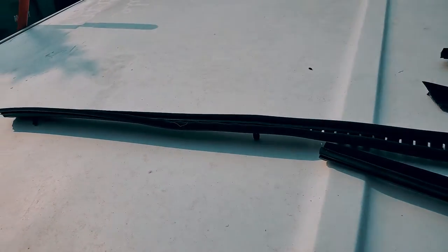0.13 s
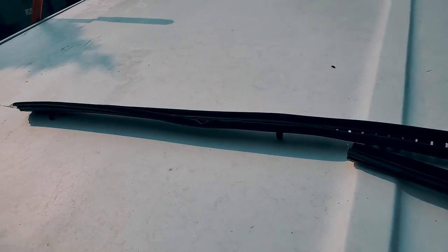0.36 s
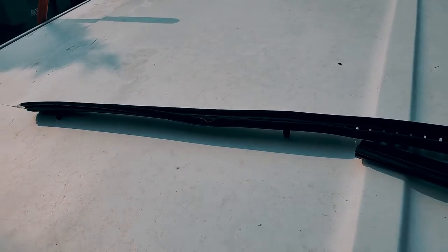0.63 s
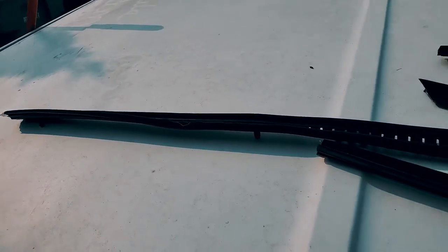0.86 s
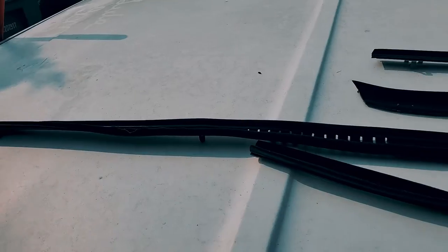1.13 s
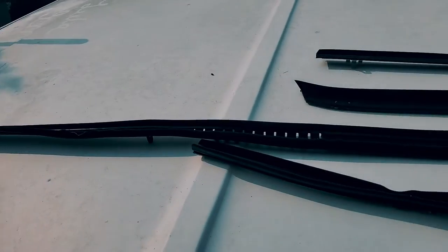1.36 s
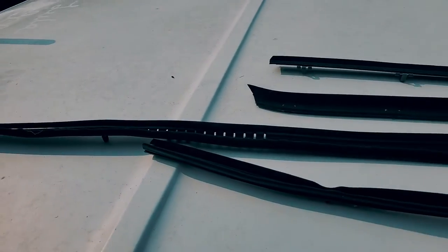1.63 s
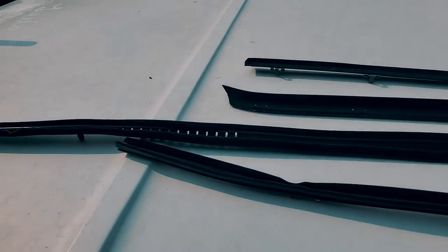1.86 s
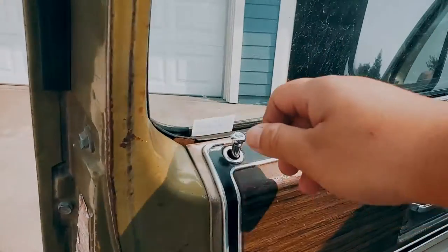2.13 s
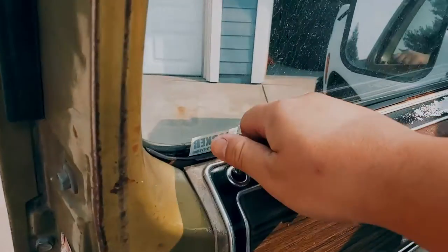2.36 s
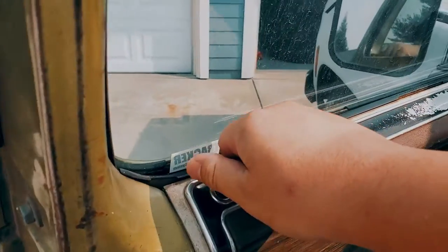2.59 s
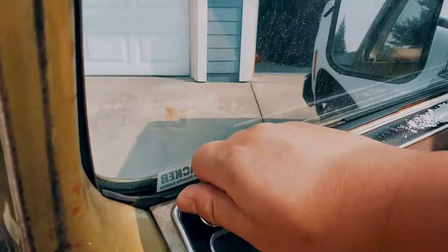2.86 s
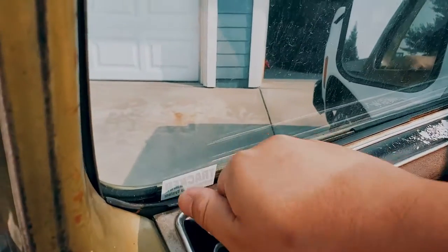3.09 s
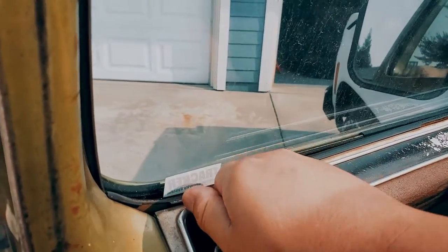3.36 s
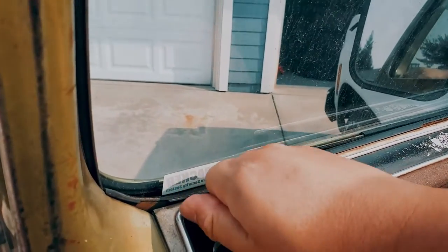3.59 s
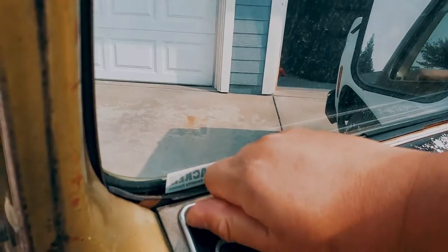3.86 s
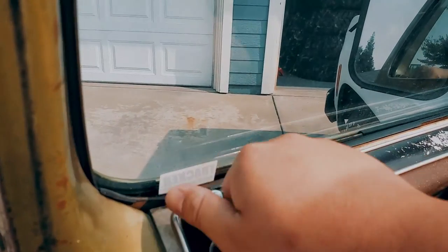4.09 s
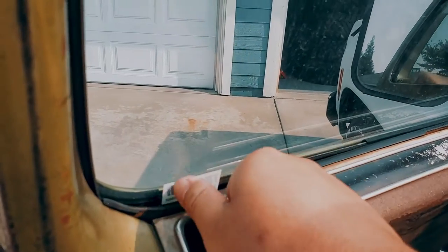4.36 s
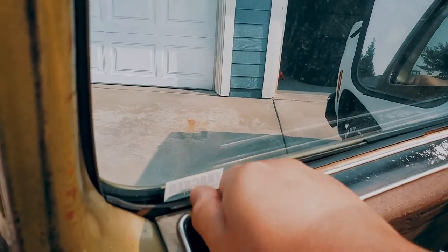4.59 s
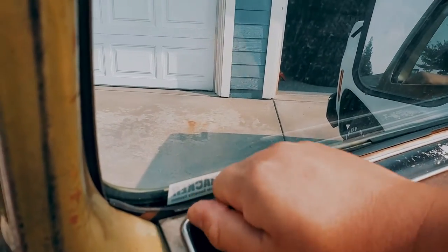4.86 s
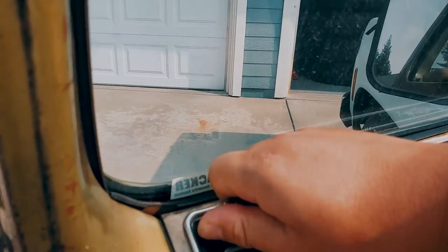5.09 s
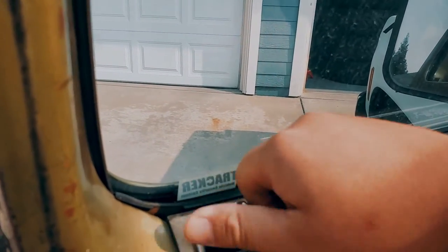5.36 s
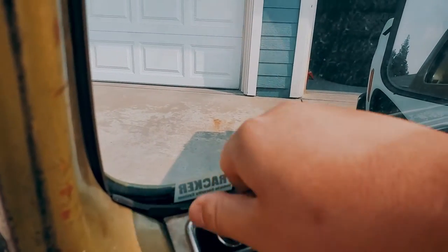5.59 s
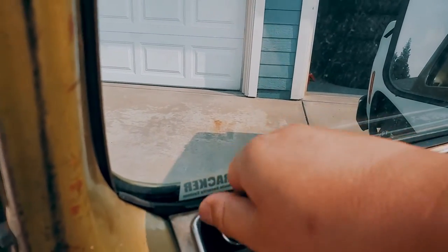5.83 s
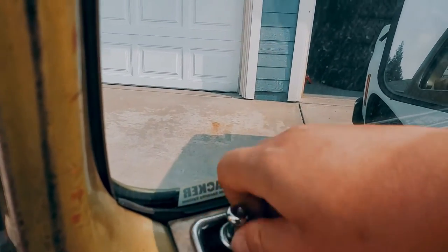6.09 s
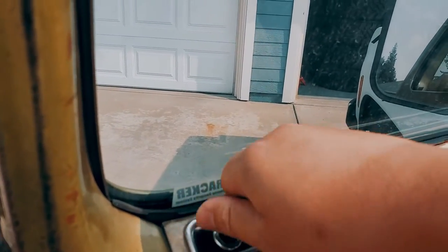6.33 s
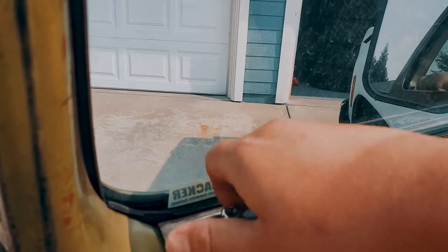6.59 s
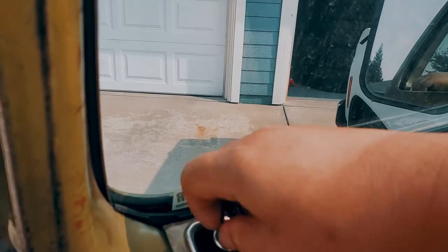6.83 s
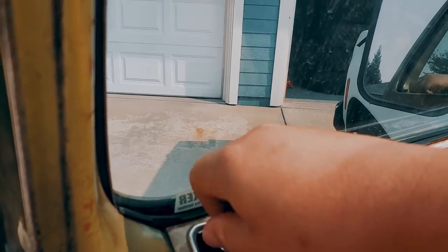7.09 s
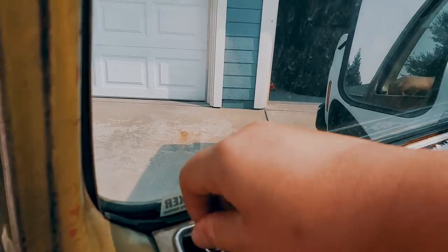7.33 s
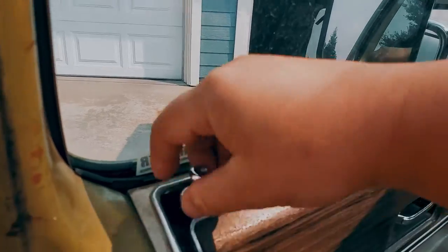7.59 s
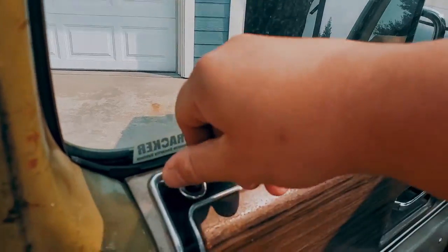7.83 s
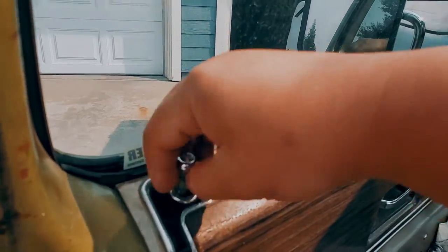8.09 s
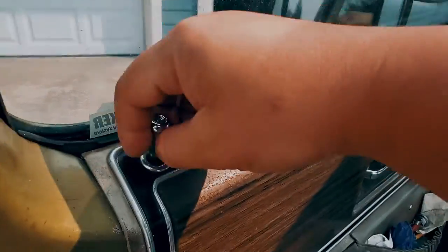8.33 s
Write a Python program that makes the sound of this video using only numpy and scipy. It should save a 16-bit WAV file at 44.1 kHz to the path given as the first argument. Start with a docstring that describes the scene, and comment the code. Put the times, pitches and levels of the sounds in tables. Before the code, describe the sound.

Quiet yard air with a distant engine passing first, then a low bump on the microphone and a tiny gap of nothing. The rest is very close stereo handling of a loose knob on a steel car door: sparse clicks with sharp clacks near the middle, panel rattling dully beneath, faint dry squeaks, and increasingly frequent gritty finger rubs towards the end.

```python
"""A far vehicle swells, then quickly fades away over the still air of a yard: noise, engine tones, a whine.
One low knock and a finger's slide on the microphone housing follow, then a brief total silence.
Then a hand works the lock knob of an open steel door: ticks are bursts of dense metal modes, rubs are
coloured noise with uneven grip, and the same forces ring the sheet and the hollow panel as modal filters.
Two close microphone ports hear it, alike in the bass and less so in the treble."""
import sys
import numpy as np
from scipy import signal
from scipy.fft import rfft, irfft, next_fast_len
from scipy.io import wavfile
from scipy.ndimage import uniform_filter1d

SR = 44100
rng = np.random.default_rng(int(sys.argv[2]) if len(sys.argv) > 2 else 0)


def elevation(decibels):
    """Turn decibel levels (scalar or array-like) into linear amplitude ratios."""
    levels = np.asarray(decibels, float)
    return 10 ** (levels / 20)


def bounce(signal):
    """Save signal as a 16-bit WAV file at the path given by the first command-line argument."""
    frames = np.transpose(np.atleast_2d(signal))
    limited = np.clip(frames, -1, 1)
    pcm = np.round(limited * 32767).astype(np.int16)
    wavfile.write(sys.argv[1], SR, pcm)


N = 372644  # length in samples

# steel door, hollow panel below 500 Hz and sheet above: (f/Hz, relative level/dB, free t60/s)
DOOR_MODES = [(93.7, -11, 0.84), (154, -4.5, 0.36), (178.9, -1, 0.2), (226.4, -6, 0.22),
              (274.2, -2.5, 0.089), (332, 4, 0.047), (363, -3, 0.18), (413, -11, 0.049), (676, 0.5, 0.025),
              (817, 1.5, 0.019), (968, 1.5, 0.01), (1188, 4, 0.015), (1500, 2.5, 0.0078),
              (1930, -5.5, 0.0063)]
HELD = 0.23  # share of the sheet's t60 left while a hand rubs it
RUB_SHAKE_DB, RUB_DEEP_DB = 4.5, 2  # rasp passed on to the upper and the lowest panel modes
# likeness of the door sound at the two ports: (f/Hz, likeness 0 to 1)
DOOR_LIKENESS = [(60, 1), (250, 0.99), (1000, 0.71), (4000, 0.25), (15000, 0.3)]
# phase by which the left port leads: (f/Hz, phase/rad)
LEFT_LEAD = [(0, -3.5), (2330, 1.5439), (5340, -2.5), (7240, -1.5), (12500, -2), (14500, -4.5)]
# level of left over right: (f/Hz, level/dB)
LEFT_LEAN = [(60, -0.5), (950, 0), (3770, 3.5), (15000, 6)]


def door():
    """Modal superposition: contact sounds radiate directly and their forces ring sheet and panel."""
    strikes, blows, snaps = knob_ticks()
    rubbing, rasp, pressure = rubs()
    slip_ticks, slip_blows = slips(pressure)
    direct = rubbing + slip_ticks + scrapes() + squeaks()
    blows += slip_blows
    shake, deep = thumps()

    grip = grit(1500, 6.8, 0.002)
    sheet_modes = [mode for mode in DOOR_MODES if mode[0] > 500]
    held_modes = [(hz, db, HELD * t60) for hz, db, t60 in sheet_modes]
    sheet = ring(3 * blows, sheet_modes) + snaps
    sheet += ring(grip * rasp * rng.standard_normal((2, N)), held_modes)
    sheet = highpass(sheet, 2, 350)

    upper_modes = [mode for mode in DOOR_MODES if 250 < mode[0] <= 500]
    lowest_modes = [mode for mode in DOOR_MODES if mode[0] <= 250]
    rattle = grit(900, 1.2, 0.0077) * rng.standard_normal((2, N))
    panel = ring((shake + elevation(RUB_SHAKE_DB) * rasp) * rattle + 0.27 * blows, upper_modes)
    panel += ring((deep + elevation(RUB_DEEP_DB) * rasp) * rattle + 0.1 * blows, lowest_modes)
    panel = highpass(panel, 2, 70)

    contact = direct * (0.38 + 0.37 * grip) + elevation(-2.5) * strikes
    return ports(contact + sheet + panel, DOOR_LIKENESS, LEFT_LEAD, LEFT_LEAN)


# strikes of knob and rod: (t/s, relative tick level/dB, force on the door over the tick/dB, colour f/Hz)
KNOB_TICKS = [(2.2321, -44, -17, 2360), (2.3493, -41.5, -8.5, 6800), (2.3702, -40, -1, 2220),
              (2.3837, -27, -17.5, 7300), (2.489, -29.5, -14, 6860), (2.577, -40.5, 2.5, 2500),
              (2.9634, -48.5, -19, 9000), (2.988, -39, -37, 5370), (3.074, -19.5, -24.5, 6960),
              (3.1442, -23.5, -17, 3960), (3.2292, -33.5, -5.5, 2140), (3.3382, -46, -22, 7000),
              (3.3576, -45.5, -22, 14000), (3.418, -49.5, -0.5, 5000), (3.5851, -37.5, -18.5, 7640),
              (3.637, -27.5, -27, 13000), (3.718, -41.5, -20, 4040), (3.955, -51, 5, 2260),
              (3.987, -29, -15.5, 2220), (4.019, -30.5, -21, 12300), (4.0328, -25, -18.5, 13200),
              (4.1, -36.5, -12, 2270), (4.128, -37, -11, 4040), (4.17, -17, -35.5, 7200),
              (4.557, -54.5, 1, 2200), (4.953, -14, -16, 5600), (5.268, -37, -24.5, 13200),
              (5.306, -10.5, -14.5, 6750), (5.335, -51, -1, 2500), (5.383, -24, -16, 2010),
              (5.514, -41.5, 2.5, 2550), (5.5687, -42, -6, 2260), (5.8383, -25, -14, 6800),
              (5.9419, -37.5, -8.5, 6000), (6.146, -8.5, -18, 7300), (6.235, -37, -7, 7040),
              (6.4223, -45.5, -16.5, 5500), (6.486, -39.5, -11, 5300), (6.5484, -29.5, -14, 7000),
              (6.6446, -37, -7.5, 6500), (6.7167, -39.5, -10, 5100), (6.7577, -43.5, -11.5, 6530),
              (6.847, -43, 0.5, 2000), (6.903, -29.5, -14, 12700), (6.934, -46, 4.5, 2500),
              (7.003, -31, -11, 2100), (7.067, -35.5, -19, 5970), (7.109, -45, -11.5, 6000),
              (7.1915, -34.5, -20, 7600), (7.205, -33, -29, 11000), (7.257, -38, -29, 10000),
              (7.267, -45.5, 1, 2500), (7.4474, -47.5, -6, 7020), (7.4758, -43, -0.5, 4130),
              (7.529, -43, -7, 6500), (7.68, -52, -7, 6000), (7.755, -44, -7, 6000),
              (7.787, -43.5, -10, 7000), (7.8156, -38.5, -5, 3470), (7.865, -55, 5, 3000),
              (7.916, -35, -29, 14700), (7.9495, -46.5, -2.5, 6000), (7.9962, -41, -3.5, 2010),
              (8.099, -36.5, -29, 2020), (8.1981, -41, -4, 7070), (8.214, -34.5, -10.5, 2140),
              (8.2924, -36.5, -11.5, 2370), (8.314, -27.5, -34, 7100), (8.386, -48, -9, 6000)]
HARD_DB = -21.5  # only ticks above this level ring the latch


def knob_ticks():
    """Impact excitation: each strike clicks, sends a blow into the door and, if hard, rings the latch."""
    strikes, blows, snaps = np.zeros((3, 2, N))
    force = jolt()
    t = np.arange(len(force)) / SR
    for s, db, force_db, hz in KNOB_TICKS:
        add(strikes, s, tick(db, hz))
        blow = elevation(db + force_db) * force * rng.standard_normal((2, len(t)))
        add(blows, s, blow)
        if db > HARD_DB:
            add(snaps, s, latch(blow * elevation(-60 * t / 0.043)))
    return strikes, blows, snaps


def jolt():
    """Two-stage decay of a contact force: the blow, then the rod rattling out."""
    t = np.arange(8192) / SR
    return elevation(-60 * t / 0.0081) + 0.31 * elevation(-60 * t / 0.26)


# spectrum of a tick: (f/Hz, relative density/dB per Hz)
TICK_SPECTRUM = [(900, -12), (1600, -11), (3900, -9.5), (7000, -2.5), (7800, -9.5), (15200, -6),
                 (16500, -35.5)]


def tick(db, hz, t60=0.066, treble_t60=0.026, tail_db=-20, tail_t60=0.28):
    """Frequency-dependent damping of dense metal modes: treble dies first, a faint duller tail stays."""
    t = np.arange(8192) / SR

    def peaks(f):
        """Random modal density: every tick draws its own peaks."""
        return elevation(4.8 * evened(uniform_filter1d(rng.standard_normal(len(f)), size=14)))

    full = evened(coloured(tinted(TICK_SPECTRUM, hz, len(t)), peaks))
    dull = coloured(full, lambda f: 1 / (1 + (f / 4500) ** 4))
    treble_decay = elevation(-60 * t / treble_t60) + 0.68 * elevation(-60 * t / 0.0041)
    body = (full - dull) * treble_decay + dull * elevation(-60 * t / t60)
    tail = (dull + 0.18 * full) * elevation(tail_db - 60 * t / tail_t60)
    rise = 1 - np.exp(-t / 0.0007)
    return elevation(db) * rise * (body + tail)


# nominal latch modes: (f/Hz, relative level/dB)
LATCH_MODES = [(973, -9.5), (1165, 1.5), (1335, -5), (1803, -4), (1949, -11), (2433, -9), (2740, -13)]
LATCH_DB, LATCH_T60, LATCH_SPREAD_DB = 9, 0.078, 3.5  # gain, decay in s, spread of mode levels


def latch(blow):
    """Modal ringing: each hard blow excites the latch modes in its own proportions, slightly detuned."""
    t = np.arange(4096) / SR
    body = np.zeros(len(t))
    for hz, db in LATCH_MODES:
        level_luck, pitch_luck = rng.standard_normal(2)
        decay = elevation(db + LATCH_SPREAD_DB * level_luck - 60 * t / LATCH_T60)
        body += decay * np.sin(2 * np.pi * hz * (1 + 0.013 * pitch_luck) * t)
    return elevation(LATCH_DB) * signal.fftconvolve(blow, body[None] / np.linalg.norm(body), axes=1)


# rubs of fingers and knob thread: (start t/s, end t/s, relative hiss level/dB, colour f/Hz)
RUB_STROKES = [(2.085, 2.204, -63.5, 2100), (2.336, 2.42, -52, 2100), (2.49, 2.674, -49.5, 5530),
               (2.739, 2.9, -63.5, 6470), (2.979, 3.028, -55, 14000), (3.335, 3.386, -57.5, 12700),
               (3.633, 3.791, -54.5, 4940), (3.939, 4.062, -54.5, 2100), (4.125, 4.163, -54, 2100),
               (4.862, 4.964, -60, 6450), (5.018, 5.189, -62, 6920), (5.183, 5.33, -64, 1915),
               (5.403, 5.47, -58.5, 2115), (5.53, 5.637, -58.5, 2100), (5.934, 6.154, -58.5, 4000),
               (6.405, 6.561, -59, 4490), (6.627, 6.688, -57.5, 2100), (6.778, 6.924, -51.5, 7200),
               (6.911, 7.056, -59, 2100), (7.144, 7.278, -50, 7400), (7.322, 7.371, -59.5, 13450),
               (7.427, 7.52, -56, 2100), (7.568, 7.665, -57, 2000), (7.673, 7.731, -53.5, 2100),
               (7.755, 7.861, -60, 2040), (7.87, 7.988, -53.5, 2050), (7.981, 8.042, -46, 2100),
               (8.084, 8.185, -48.5, 2100), (8.181, 8.291, -56, 2100), (8.266, 8.375, -52, 3900),
               (8.418, 8.477, -45, 6500), (6.504, 8.8, -71.5, 9100)]
# spectrum of rubbing: (f/Hz, relative density/dB per Hz)
RUB_SPECTRUM = [(1500, -16.5), (2500, -10.5), (4200, -6.5), (6800, -4), (8200, -10.5), (15000, -5.5),
                (16300, -24)]
RASP_DB, RASP_DB_PER_OCTAVE, DULL_HZ = 0.5, -1.5, 2100  # duller rubs rasp more


def rubs():
    """Friction noise: each stroke hisses, weakens as it goes and drives the door with a rasp."""
    rubbing, rasp, pressure = np.zeros((2, N)), np.zeros(N), np.zeros(N)
    for start, end, db, hz in RUB_STROKES:
        size = round((end - start) * SR)
        stroke = elevation(db + np.linspace(2, -3, size)) * signal.windows.tukey(size, .6)
        rasp_db = RASP_DB + RASP_DB_PER_OCTAVE * np.log2(hz / DULL_HZ)
        add(pressure, start, stroke)
        add(rasp, start, elevation(rasp_db) * stroke)
        add(rubbing, start, stroke * tinted(RUB_SPECTRUM, hz, size))
    return rubbing, rasp, pressure


SLIPS_PER_S, SLIP_DB = 30, 7.5  # mean rate, and typical size over the stroke


def slips(pressure):
    """Stick-slip: random releases in proportion to the stroke tick and jolt the door."""
    sizes = elevation(SLIP_DB + 2.6 * rng.standard_normal(N))
    releases = (rng.random(N) < SLIPS_PER_S / SR) * sizes * pressure
    small_tick = tick(0, 6000, t60=0.02, treble_t60=0.0067, tail_db=-12.5)
    ticks = signal.oaconvolve(releases[None], small_tick, axes=1)[:, :N]
    force = signal.oaconvolve(releases, jolt())[:N]
    return ticks, elevation(-11) * force * rng.standard_normal((2, N))


# coarse rasps of the knob stem:
# (start t/s, end t/s, relative level/dB, first f/Hz, last f/Hz, nominal bandwidth/Hz)
STEM_SCRAPES = [(2.499, 2.626, -34.5, 1570, 2360, 1020), (5.203, 5.257, -55.5, 1400, 1500, 600)]
SWELL_DB, SWELL_TOP = 3, 0.9  # rise towards the loudest moment, and its place as a share of the length


def scrapes():
    """Resonant friction: noise in one climbing resonance swells before the stem lets go."""
    out = np.zeros((2, N))
    for start, end, db, first_hz, last_hz, width in STEM_SCRAPES:
        size = round((end - start) * SR)
        hz = np.geomspace(first_hz, last_hz, size)
        band = evened(twice_resonant(rng.standard_normal((2, size)), hz, width))
        swell_db = np.interp(np.arange(size) / size, [0, SWELL_TOP, 1], [-SWELL_DB, 0, -14])
        add(out, start, elevation(db + swell_db) * signal.windows.tukey(size, .15) * band)
    return out


# squeaks of the dry stem: (start t/s, end t/s, relative level/dB)
STEM_SQUEAKS = [(5.983, 6.144, -57), (6.803, 6.916, -55.5)]
# nominal resonances of the stem: (f/Hz, bandwidth/Hz, relative level/dB)
STEM_RESONANCES = [(2750, 150, -5), (4350, 350, -1.5)]
SAG, CLIMB_S, WAVER = .25, 0.032, .015  # starts flat by this share, climbs, wavers by this share


def squeaks():
    """Source and filter: rubbing noise passes stem resonances that climb as the stem tightens."""
    out = np.zeros((2, N))
    for start, end, db in STEM_SQUEAKS:
        size = round((end - start) * SR)
        waver = WAVER * evened(uniform_filter1d(rng.standard_normal(size), size=600))
        bend = 1 - SAG * np.exp(-np.arange(size) / SR / CLIMB_S) + waver
        noise = rng.standard_normal((2, size))
        lines = sum(elevation(line_db) * twice_resonant(noise, hz * bend, width)
                    for hz, width, line_db in STEM_RESONANCES)
        add(out, start, elevation(db) * signal.windows.tukey(size, .4) * evened(lines))
    return out


# the rod shakes the hollow panel: (t/s, relative force on upper modes/dB, lowest modes over that/dB)
ROD_THUMPS = [(2.377, -34, -7), (3.079, -34, -8.5), (3.146, -37.5, -5), (3.237, -36, -4.5),
              (3.42, -39, -10), (3.645, -43.5, -5), (3.957, -39, -14), (4.025, -38.5, -6), (4.174, -39, 0),
              (4.957, -28.5, -3), (5.307, -28.5, -6.5), (5.391, -36, -12), (5.515, -38, -1),
              (5.95, -37.5, -7), (6.15, -23, -5), (6.223, -33, -4), (6.463, -37, -4.5), (6.643, -35, 0.5),
              (6.838, -38.5, -1.5), (6.978, -30, -0.5), (7.195, -36.5, -11.5), (7.261, -30, -4.5),
              (7.706, -38, -6), (7.988, -46, -5), (8.206, -40.5, -8)]
THUMP_RISE_S, THUMP_T60 = 0.0059, 0.27
DEEP_RISE_S, DEEP_T60, DEEP_DB = 0.026, 0.43, 4  # the lowest modes build up later and last longer


def thumps():
    """Force envelopes: exponential rise and decay, separate for the upper and the lowest panel modes."""
    shake, deep = np.zeros((2, N))
    t = np.arange(8192) / SR
    for s, db, deep_db in ROD_THUMPS:
        add(shake, s, elevation(db - 60 * t / THUMP_T60) * (1 - np.exp(-t / THUMP_RISE_S)))
        deep_level = db + deep_db + DEEP_DB
        add(deep, s, elevation(deep_level - 60 * t / DEEP_T60) * (1 - np.exp(-t / DEEP_RISE_S)))
    return shake, deep


# modes of the knocked microphone housing: (t/s, f/Hz, level at the right port/dB, t60/s)
HOUSING_KNOCK = [(1.516, 115, -8.5, 0.023), (1.525, 45, -29, 0.27), (1.547, 75, -21.5, 0.07)]
# click of the knock: (t/s, relative level/dB, colour f/Hz)
HOUSING_TICK = (1.515, -34, 11000)
# finger sliding on the housing, end values held: (t/s, relative level/dB)
FINGER_SLIDE = [(1.757, -99.5), (1.762, -55), (1.83, -77.5), (1.9, -62), (1.96, -79)]


def housing():
    """Structure-borne sound: damped sines for the knock, noise for the finger, louder at the right port."""
    knock, t = np.zeros((1, N)), np.arange(8192) / SR
    for s, hz, db, t60 in HOUSING_KNOCK:
        add(knock, s, -elevation(db - 60 * t / t60) * np.sin(2 * np.pi * hz * t))
    s, db, hz = HOUSING_TICK
    add(knock, s, tick(db, hz)[:1])
    finger_spectrum = [(800, -17.0), (2800, -17.5), (4200, -6.0), (6000, -19.5), (16000, -15.5)]
    slide = elevation(along(FINGER_SLIDE)) * hiss(finger_spectrum)
    knock_balance, slide_balance = elevation([[-18], [0]]), elevation([[-5], [3]])  # left, right
    return knock * knock_balance + slide * slide_balance


# far vehicle swelling, then quickly fading, end values held: (t/s, level/dB)
VEHICLE_LEVEL = [(0, -62.5), (.3, -54), (.6, -53), (.72, -57.5), (.8, -71), (.95, -86.5)]
# roar of the vehicle: (f/Hz, relative density/dB per Hz)
ROAR_SPECTRUM = [(24, -45.5), (40, -14), (181, -1), (211, -17), (294, -11), (668, -19.5), (1600, -30),
                 (2500, -38.5), (6700, -43), (8000, -59.5), (17600, -120)]
# engine tones at the vehicle's loudest: (f/Hz, rms level/dB)
ENGINE_TONES = [(177.6, -57.5), (296.1, -64.5)]
# whine, sounding only while its pitch moves: (t/s, f/Hz)
WHINE_PITCH = [(.4, 9500), (.62, 12300), (.84, 9800)]
WHINE_DB = -91
# still air of the yard: (f/Hz, relative density/dB per Hz)
AIR_SPECTRUM = [(25, -11.5), (60, 6.5), (273, -7), (313, -17), (422, -11), (540, -21), (600, -13.5),
                (651, -18.5), (831, -28.5), (5880, -47), (6920, -33.5), (7510, -50.5), (16500, -43)]
AIR_DB = -55.5
# likeness of the yard at the two ports: (f/Hz, likeness 0 to 1)
YARD_LIKENESS = [(60, 1), (950, 0.33), (4000, 0.18)]


def yard():
    """Broadband noise and tones: wavering air, a vehicle that swells and fades, a rising and falling whine."""
    t = np.arange(N) / SR
    waver = elevation(0.23 * evened(uniform_filter1d(rng.standard_normal(N), 8000)))
    air = elevation(AIR_DB) * waver * hiss(AIR_SPECTRUM)
    vehicle_db = along(VEHICLE_LEVEL)
    roar = elevation(vehicle_db) * hiss(ROAR_SPECTRUM)
    swell = elevation(vehicle_db - max(db for s, db in VEHICLE_LEVEL))
    hum = swell * sum(np.sqrt(2) * elevation(db) * np.sin(2 * np.pi * hz * t) for hz, db in ENGINE_TONES)
    whine_hz = along(WHINE_PITCH)
    gliding = np.gradient(whine_hz) != 0
    whine_level = elevation(WHINE_DB) * waver ** 20 * gliding  # the air's waver in dB, twenty times deeper
    whine = whine_level * np.sin(2 * np.pi * np.cumsum(whine_hz) / SR)
    return ports(air + roar, YARD_LIKENESS) + whine + hum


def ring(force, modes):
    """Convolution with decaying modes of unit energy: steady white noise keeps its rms."""
    t = np.arange(SR // 2) / SR
    body = sum(elevation(db - 60 * t / t60) * np.sin(2 * np.pi * hz * t) for hz, db, t60 in modes)
    return signal.oaconvolve(force, body[None] / np.linalg.norm(body), axes=1)[:, :N]


def resonate(x, hz, width):
    """Heterodyne resonance: shifts the moving centre hz to zero, smooths, and shifts back."""
    turn, r = np.exp(2j * np.pi * np.cumsum(hz) / SR), np.exp(-np.pi * width / SR)
    return 2 * (turn * signal.lfilter([1 - r], [1, -r], x / turn)).real


def twice_resonant(x, hz, width):
    """Cascaded resonances: a second one, twice as wide, steepens the skirts."""
    return resonate(resonate(x, hz, width), hz, 2 * width)


def grit(per_s, spread_db, grain_s):
    """Poisson-like friction: random slips of unequal size, smeared by an exponential decay."""
    sizes = elevation(spread_db * np.minimum(rng.exponential(1, N), 4))
    impulses = sizes * (rng.random(N) < per_s / SR)
    fade = np.exp(-1 / (grain_s * SR))
    return evened(signal.lfilter([1], [1, -fade], impulses))


def ports(pair, same, lead=((0, 0), (1, 0)), lean=((0, 0), (1, 0))):
    def like(hz):
        return np.clip(read(same, hz), 0, 1)

    def half_lean(hz):
        return elevation(read(lean, hz) / 2)

    left = coloured(pair[0], half_lean)
    right = coloured(pair[0], lambda hz: like(hz) * np.exp(-1j * read(lead, hz)) / half_lean(hz))
    right += coloured(pair[1], lambda hz: np.sqrt(1 - like(hz) ** 2) / half_lean(hz))
    return np.array([left, right])


def tinted(points, hz, size):
    """Spectral shaping: two takes of noise with the given spectrum and a broad hump at hz, rms 1."""
    def gain(f):
        hump_db = 6.3 * np.exp(-(np.log((f + 1) / hz) / 0.44) ** 2)
        return elevation(read(points, f) + hump_db)

    return evened(coloured(rng.standard_normal((2, size)), gain))


def hiss(points):
    """Spectral shaping: two takes of noise with the given spectrum, rms 1."""
    return evened(coloured(rng.standard_normal((2, N)), lambda hz: elevation(read(points, hz))))


def coloured(x, gain):
    """Linear filtering in the frequency domain: one gain per bin."""
    size = next_fast_len(x.shape[-1])
    return irfft(rfft(x, size) * gain(np.fft.rfftfreq(size, 1 / SR)), size)[..., :x.shape[-1]]


def highpass(x, order, hz):
    """Maximally flat (Butterworth) high-pass filtering."""
    return signal.sosfilt(signal.butter(order, hz, "high", fs=SR, output="sos"), x)


def read(points, hz):
    """Interpolation of a spectrum table on a log-frequency axis."""
    f, value = np.transpose(points)
    return np.interp(np.log(hz + 1), np.log(f + 1), value)


def along(rows):
    """Linear interpolation of a time curve at every sample."""
    s, value = np.transpose(rows)
    return np.interp(np.arange(N) / SR, s, value)


def evened(x):
    """Power normalisation to rms 1."""
    return x / np.sqrt(np.mean(x ** 2) + 1e-20)


def add(mix, s, sound):
    """Superposition: mixes a sound in at time s."""
    part = mix[..., round(s * SR):][..., :sound.shape[-1]]
    part += sound[..., :part.shape[-1]]


# total silence: (start t/s, end t/s)
SILENCE = (1.973, 2.101)


def scene():
    """Superposition of all sources, gated to zero during the brief silence."""
    t = np.arange(N) / SR
    gate = np.clip(np.maximum(SILENCE[0] - t, t - SILENCE[1]) / 0.0018, 0, 1)  # 1.8 ms ramps
    return (door() + housing() + yard()) * gate


def low_pass(x):
    """Removes everything above the highest recorded frequency."""
    return signal.sosfilt(signal.butter(12, 17150, fs=SR, output="sos"), x)


def record(dry):
    """Band-limiting: the microphone rolls off the deepest bass and the top treble."""
    heard = highpass(dry, 4, 38)
    heard = signal.sosfiltfilt(signal.butter(10, 16300, fs=SR, output="sos"), heard)
    return low_pass(heard)


dry = scene()
out = record(dry)
bounce(out)
```